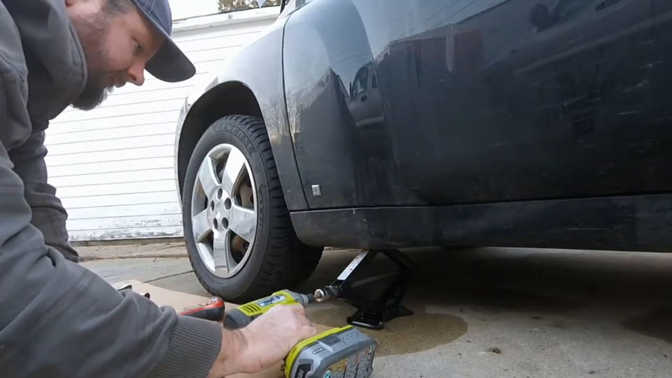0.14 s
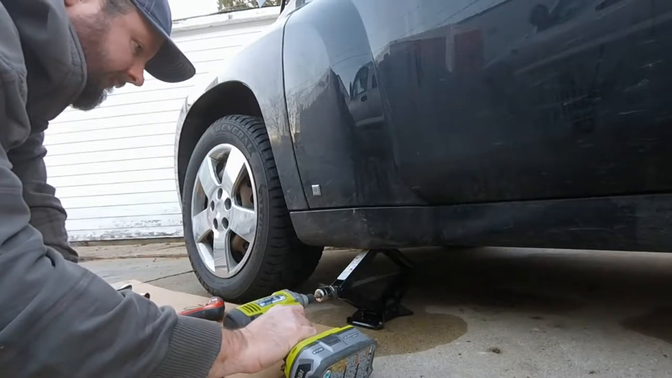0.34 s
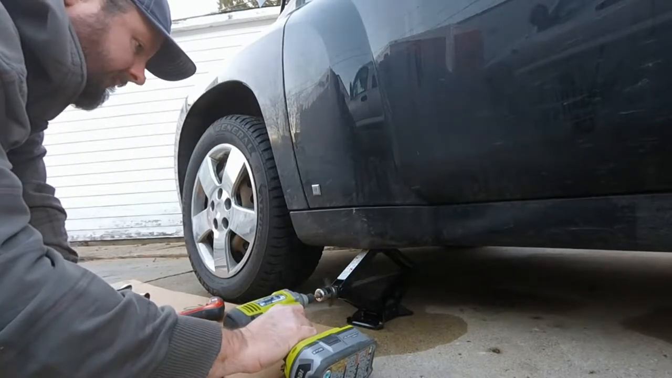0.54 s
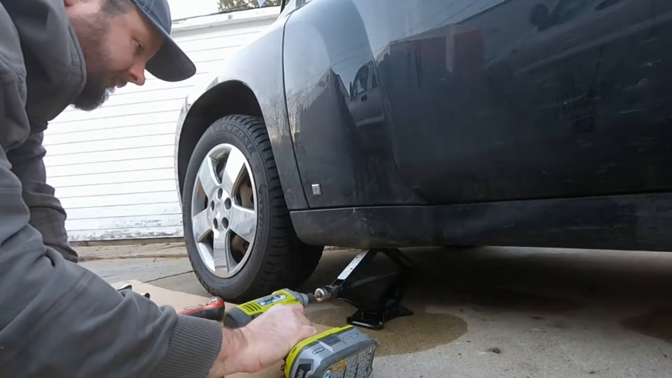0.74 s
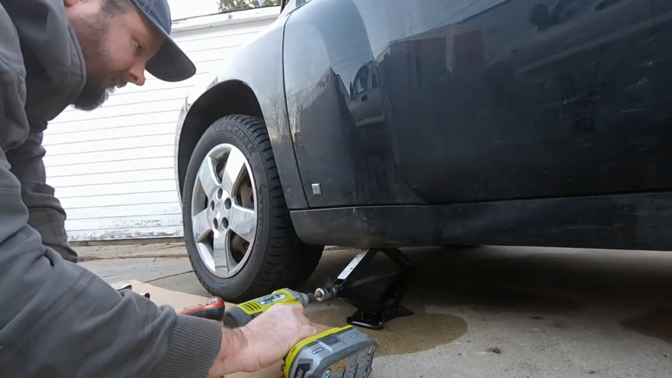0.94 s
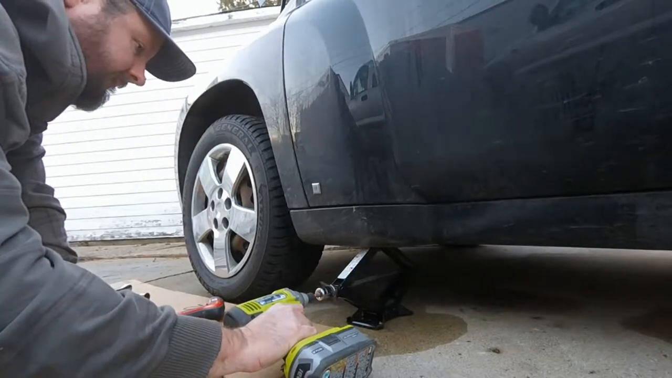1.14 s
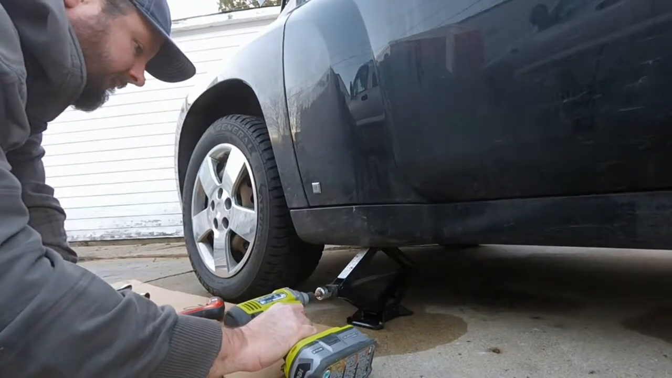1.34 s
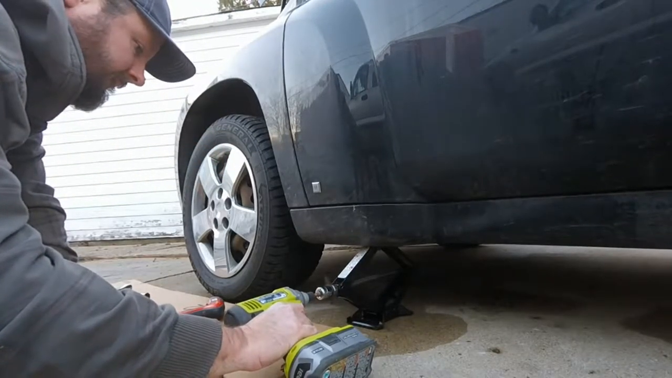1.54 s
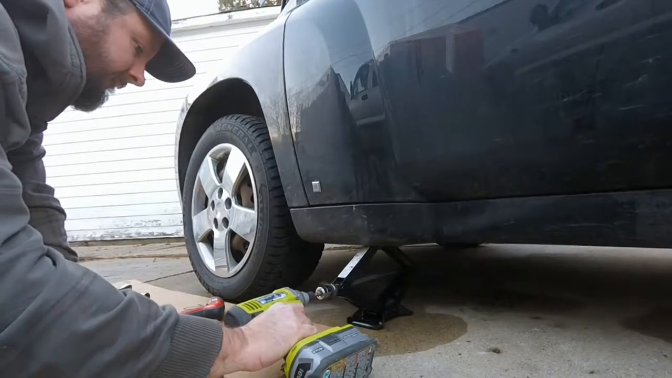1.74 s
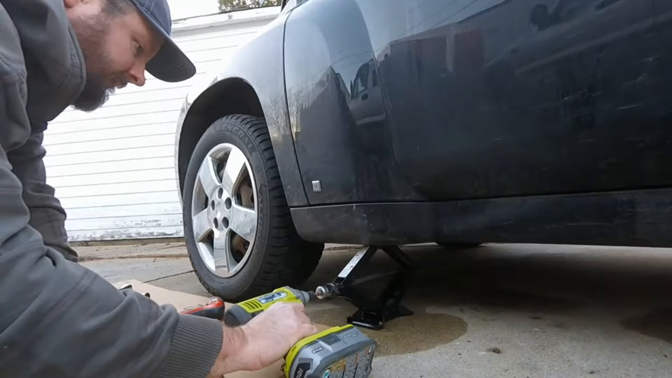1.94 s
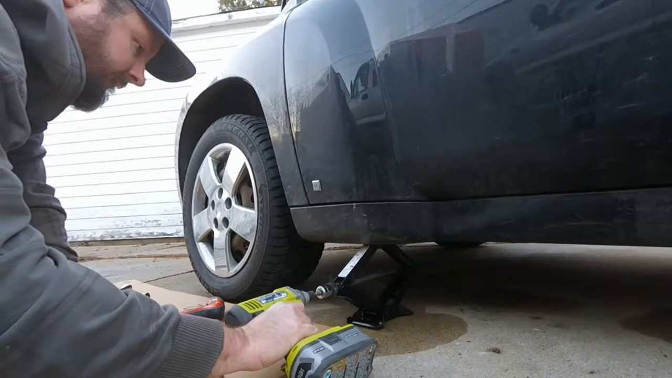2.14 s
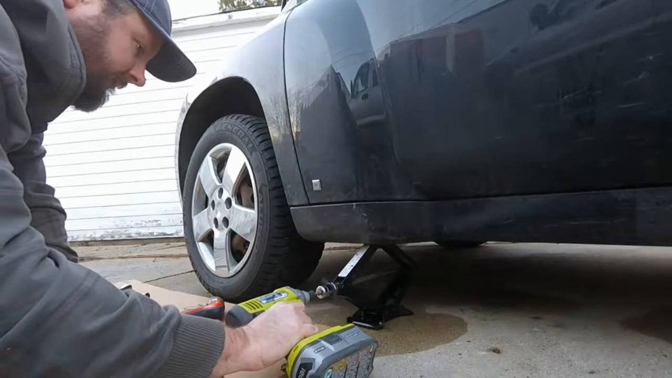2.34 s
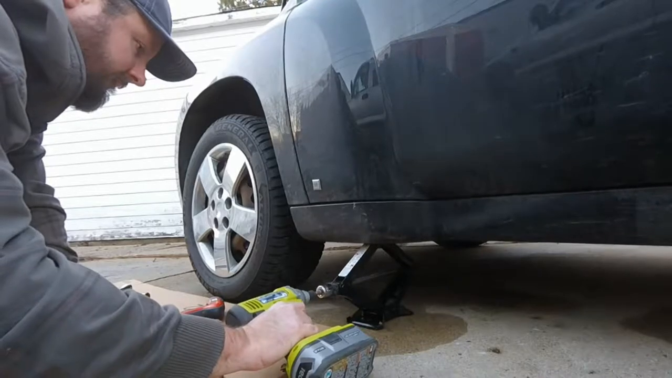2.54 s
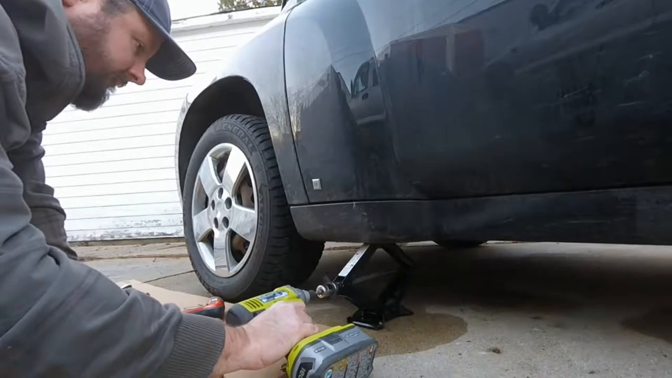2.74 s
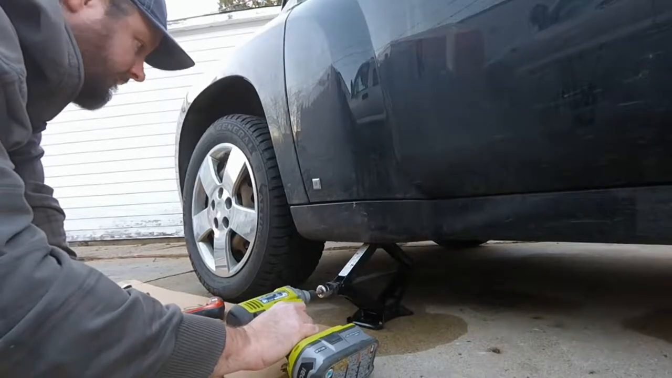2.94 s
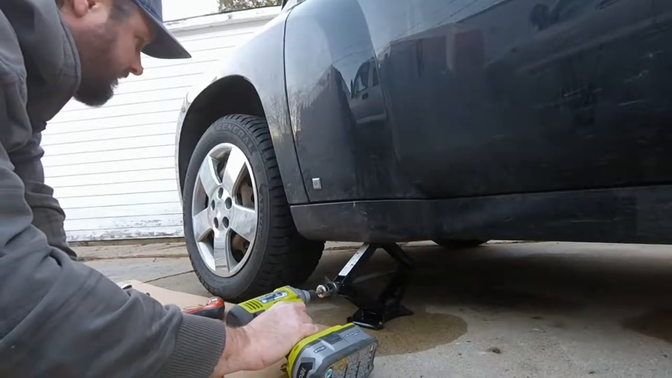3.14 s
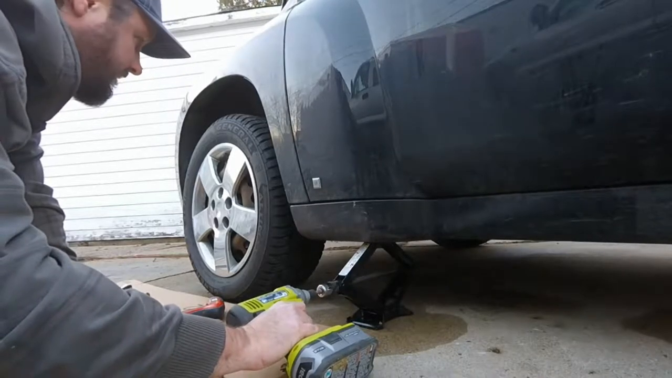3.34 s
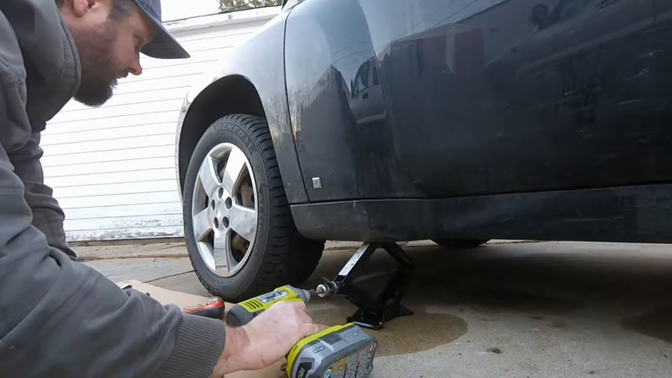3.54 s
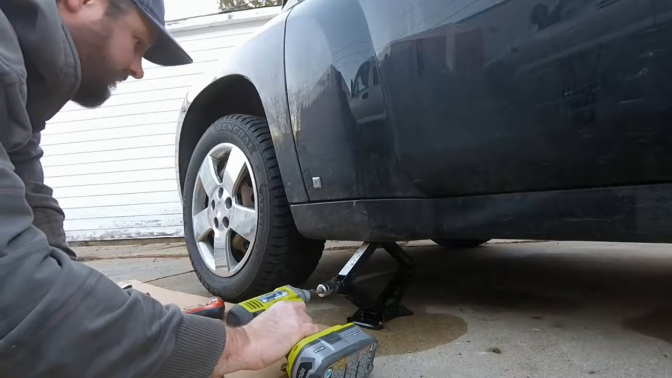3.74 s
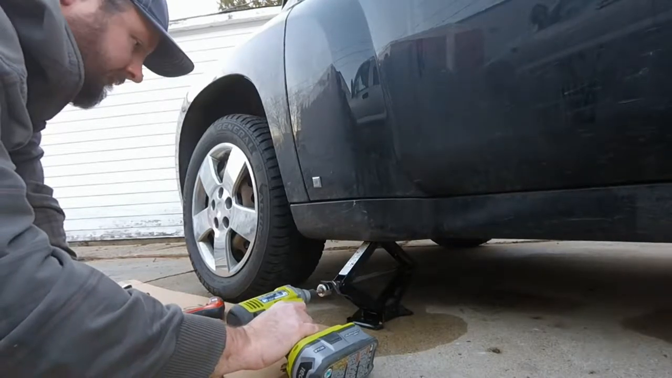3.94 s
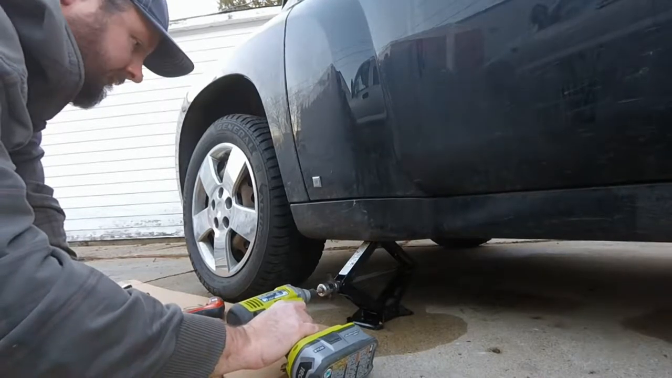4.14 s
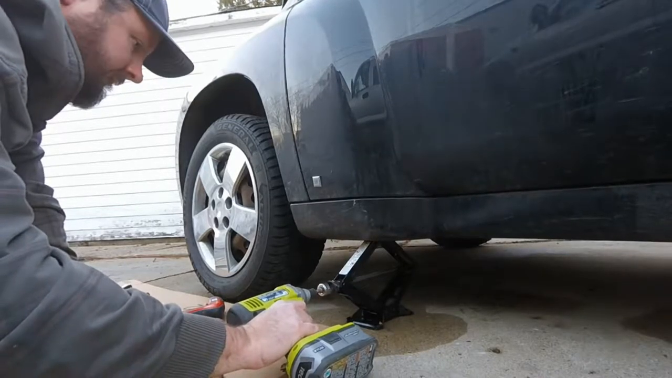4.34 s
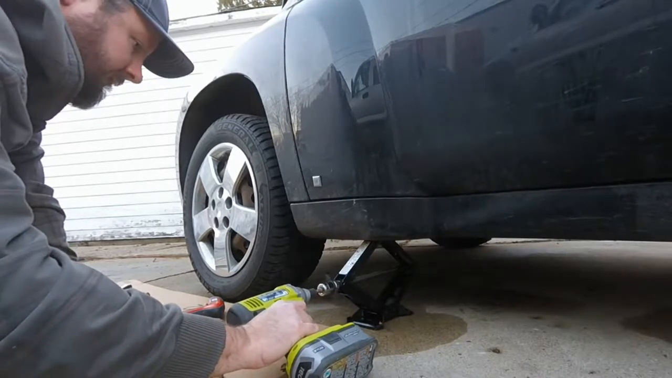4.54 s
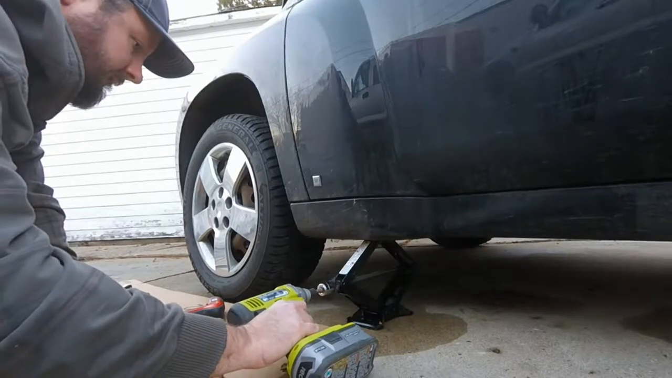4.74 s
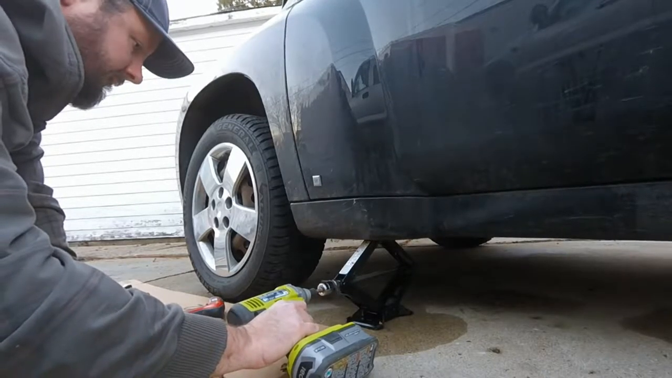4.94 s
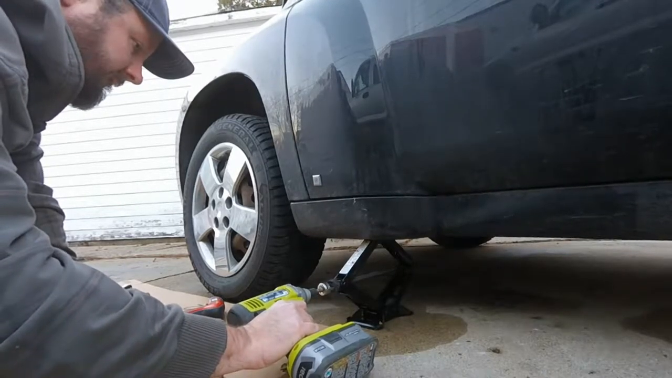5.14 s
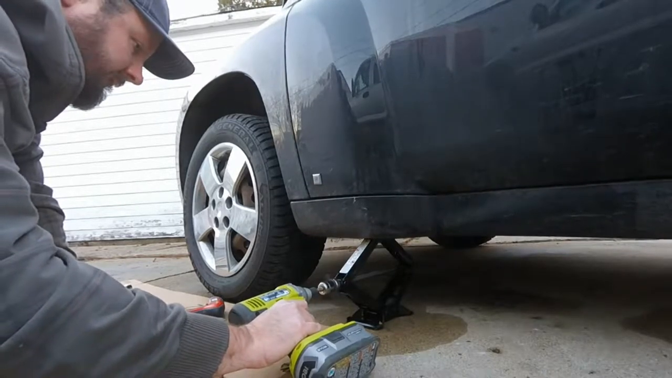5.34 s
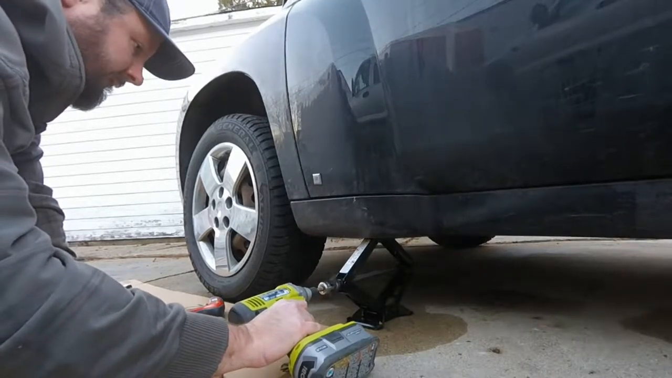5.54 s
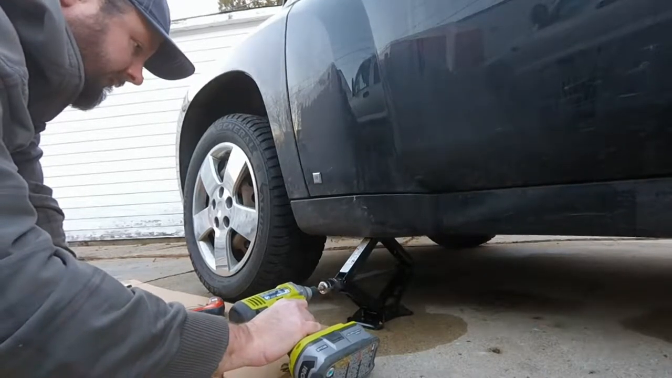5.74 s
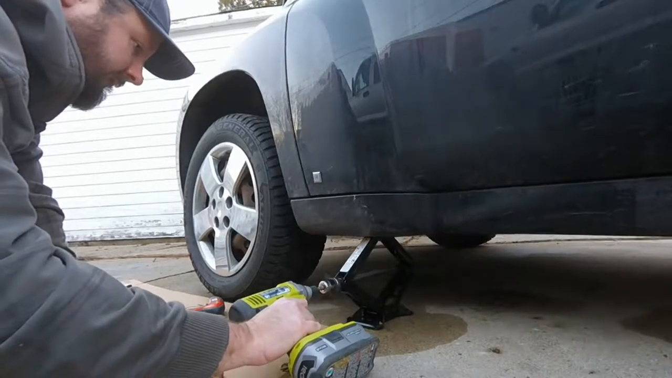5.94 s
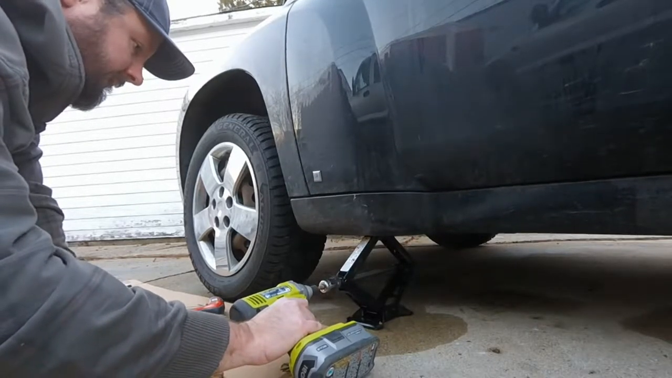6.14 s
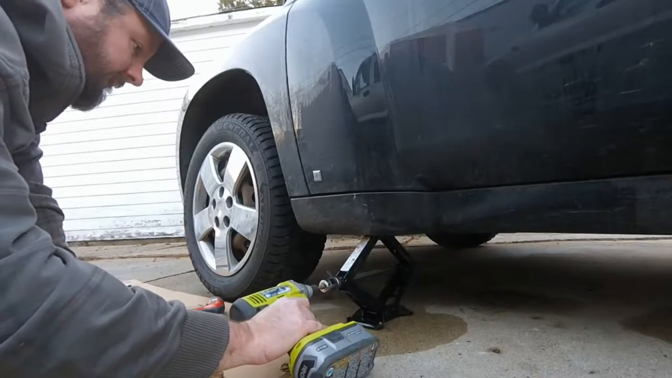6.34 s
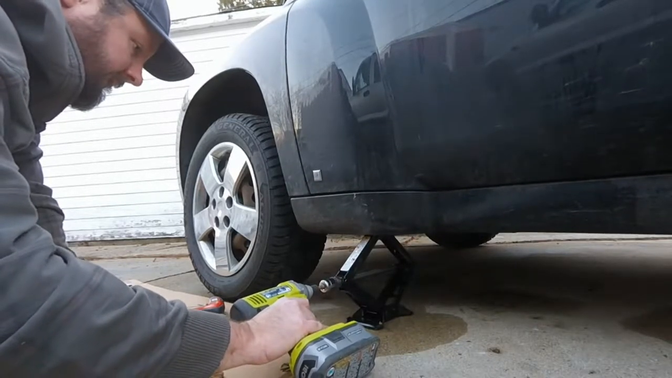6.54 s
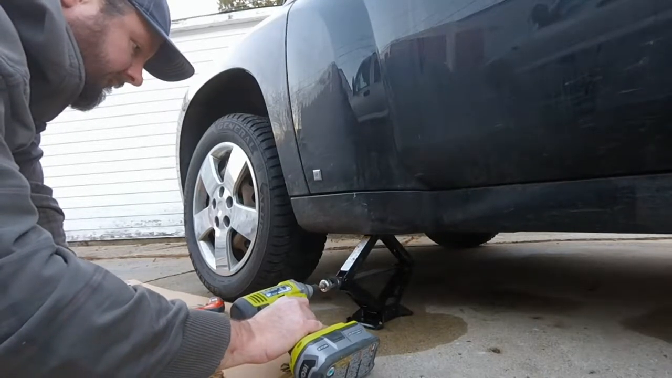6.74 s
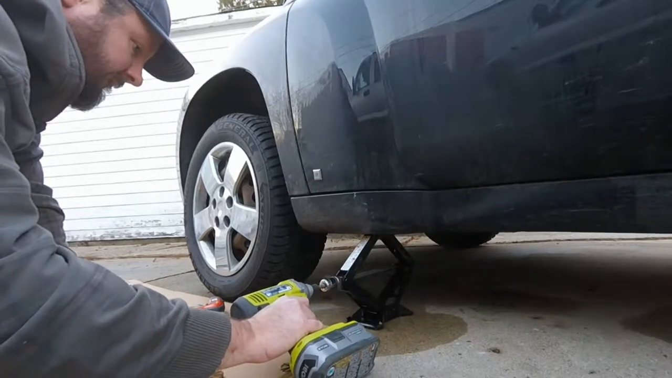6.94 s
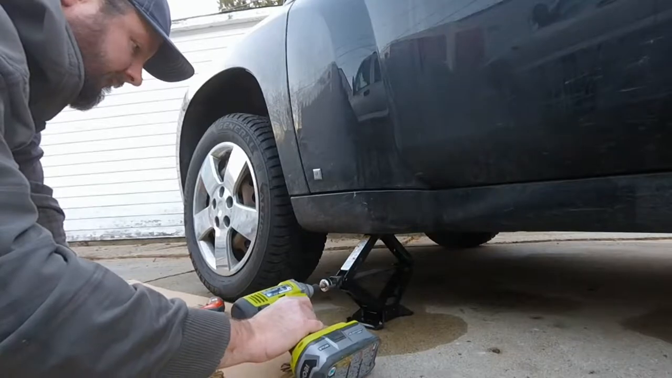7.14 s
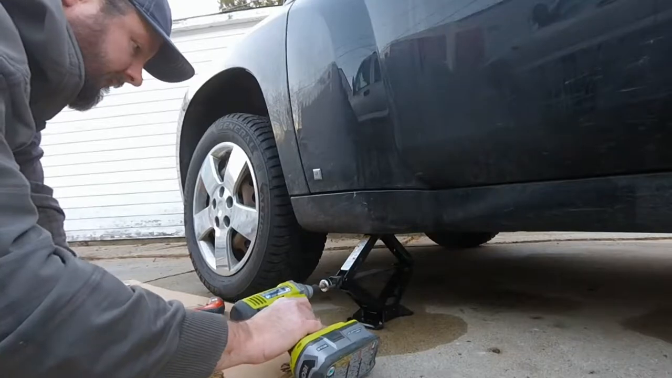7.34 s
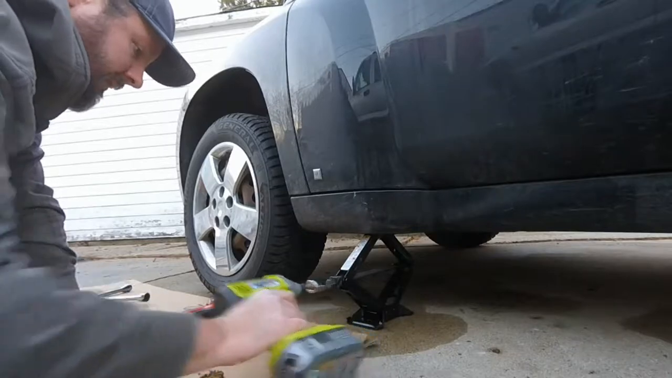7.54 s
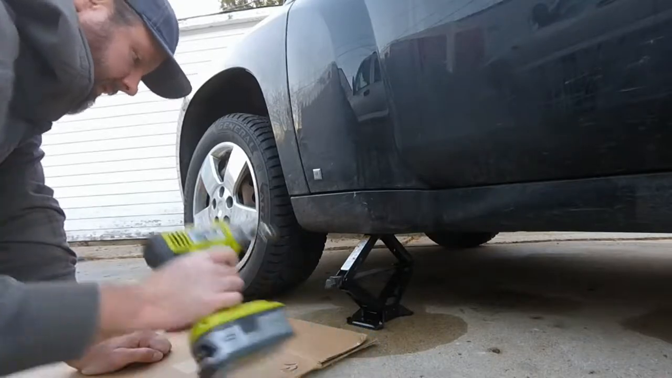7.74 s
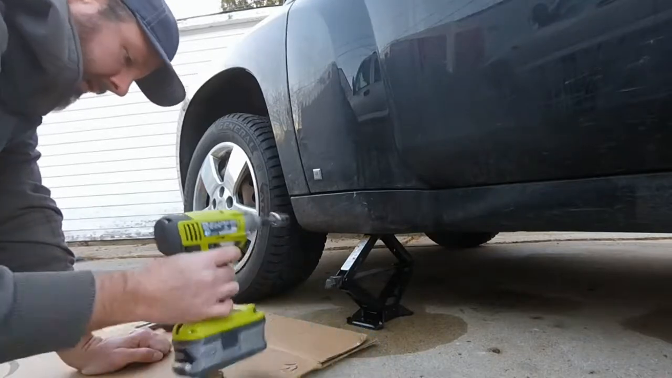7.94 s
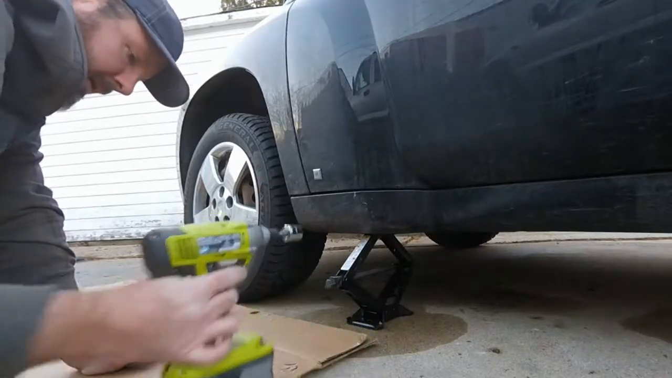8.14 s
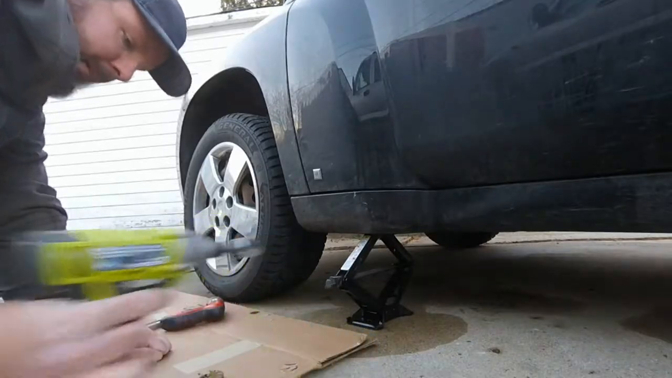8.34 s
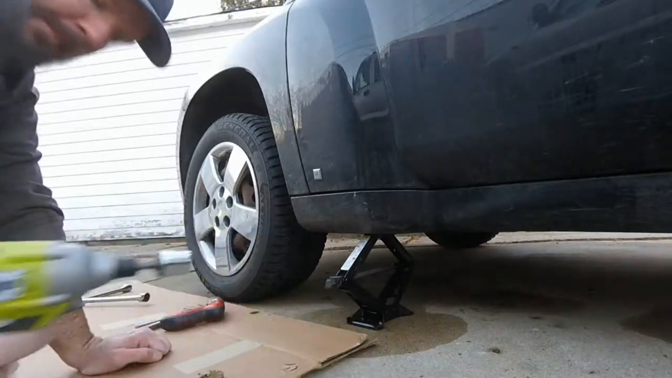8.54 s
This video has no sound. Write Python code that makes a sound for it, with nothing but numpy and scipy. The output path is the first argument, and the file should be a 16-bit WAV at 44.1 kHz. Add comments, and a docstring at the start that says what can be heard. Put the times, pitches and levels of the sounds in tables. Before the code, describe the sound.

A cordless impact driver hammers a car jack outdoors in a long metallic stutter, then short faster bursts, ending with soft wind puffs.

```python
"""Slow single blows of a cordless impact driver crack out over a faint motor whirr and a light breeze.
The driver is winding up a scissor jack under a car, outdoors on a concrete drive. Each hammer blow hits
the steel socket, rings the jack's frame and thuds into the car. The blows run into a long stutter as the
jack takes the weight, then into short, faster bursts. The tool comes off with small knocks and a sleeve
rustle, and a few puffs of wind buffet the microphone."""
import sys
import numpy as np
from scipy import signal
from scipy.fft import rfft, irfft
from scipy.io import wavfile

SR = 44100
rng = np.random.default_rng(int(sys.argv[2]) if len(sys.argv) > 2 else 0)


def generate_wav(signal):
    """Clip the signal to [-1, 1] and save it as 16-bit WAV at the path in sys.argv[1]."""
    frames = np.transpose(np.atleast_2d(signal))
    scaled = np.clip(frames, -1, 1) * 32767
    pcm = np.round(scaled).astype(np.int16)
    wavfile.write(sys.argv[1], SR, pcm)


N = 378819

# EQ curves, shape only: f/Hz, level/dB
GEAR_EQ = [(59, -32.5), (100, -24.5), (425, -9), (617, -13.5), (841, -5.5), (1440, -28), (3580, -28.5),
           (4220, -34.5), (5410, -31.5), (9070, -51), (10900, -52.5), (12600, -49), (14000, -61)]  # motor and gear whirr
WIND_EQ = [(8.8, 5.5), (15, 10.5), (32, 4), (55, -1), (130, -18), (151, -41.5), (182, -21.5), (300, -61.5),
           (390, -93), (660, -120)]  # wind rumble
AMBIENCE_EQ = [(15, -38), (25, 2), (86, -2), (152, -5), (329, -13), (373, -17), (563, -17.5), (896, -15),
               (1070, -22), (1170, -29.5), (1280, -33), (1800, -44), (2340, -45.5), (3960, -120)]  # outdoor hush
STEEL_EQ = [(880, -30), (1500, -4), (1850, -3.5), (2170, 1), (2350, -2), (2560, 3), (2950, -3), (3410, 3.5),
            (3850, -1), (4150, -9), (4480, -7), (4900, -1.5), (5340, -1), (5900, -1.5), (6680, -4.5),
            (7400, -9.5), (8970, -15), (12000, -14.5), (14500, -24), (15500, -55)]  # bright struck steel
PANEL_EQ = [(120, -41), (200, -3), (269, 4), (301, -63), (377, 14.5), (461, 5), (664, -11.5), (893, 6.5),
            (1010, 22.5), (1600, 11), (2080, -79), (3520, -120)]  # rattling car panels
SLEEVE_EQ = [(900, 9), (1500, 4), (3000, 0.5), (6000, -4.5), (8500, -11.5), (12000, -16), (15000, -22.5)]  # rustling cloth
KNOCK_EQ = [(180, -44), (300, -17.5), (649, 3.5), (1050, -3), (1490, -44), (3490, -18), (4900, -32),
            (5300, -35.5), (6680, -36), (12000, -68), (15600, -89), (22000, -120)]  # dull handling knock
# puffs of wind on the microphone: t/s, half length/s, level/dB
GUSTS = [(7.367, 0.053, -17.5), (7.592, 0.085, -16), (7.829, 0.03, -33), (7.984, 0.072, -25),
         (8.125, 0.078, -23)]
# single hammer blows: t/s, steel level/dB, body level/dB
SINGLE_BLOWS = [(0.0486, 4, 18.5), (0.175, 2.5, 17), (0.3, -2.5, 17), (0.4155, 0, 16), (0.489, -3, 14),
                (0.5458, -0.5, 14), (0.602, -1.5, 14), (0.6568, 1, 14.5), (0.7118, -1.5, 13),
                (0.765, -0.5, 14.5), (0.819, -4.5, 12.5), (0.8683, 1.5, 15), (5.556, -2, 11),
                (5.603, -5, 10), (6.451, -5, 7)]
# ring of socket and anvil: f/Hz, t60/s, level/dB
SOCKET_MODES = [(2270, 0.076, -8), (2450, 0.21, -14), (3230, .025, -12), (3410, 0.016, -12),
                (3486, 0.018, -14.5), (3750, 0.011, -6), (3866, .03, -6), (5520, 0.042, -11),
                (6210, 0.03, -15.5), (6633, 0.018, -3)]
# the hammer's bounce against its blow: t/s, level/dB
BOUNCE_LEVEL = [(.5, -6), (1.5, 0), (2.6, -5.5), (5.2, 1), (5.6, -2.5)]
# ring of the jack's frame and the sill above it:
# f/Hz, t60/s, lightly loaded level/dB, fully loaded level/dB, level under fast blows/dB
FRAME_MODES = [(274.5, 0.12, -17, -21, -18.5), (375.4, 0.29, -19, -9, -17), (388.2, 0.13, -5, -15.5, -8.5),
               (416.2, 0.14, -9, -9, -18.5), (467.3, 0.26, -17, -2, -6.5), (511.6, 0.23, -41, -11.5, -10.5),
               (538.3, 0.26, -44, -15, -12.5), (571.4, 0.24, -39, -8.5, -11.5),
               (598, 0.098, -21, -14, -8.5), (696, 0.029, -12.5, -24, -38), (815, 0.44, -13.5, -11, -18),
               (880, 0.14, -3.5, -12, -21), (915.2, 0.19, -9, -8.5, -9), (1006, 0.063, -9, -13, -10),
               (1064, 0.1, -21, -15.5, -17), (1137, 0.067, -24, -15, -16), (1192, 0.09, -19, -13, -21.5),
               (1386, 0.049, -31, -21.5, -20)]
# the screw binds and the clank turns higher and louder: t/s, half length/s, strength/0-1
BINDS = [(0.615, 0.29, 0.68), (1.997, 0.091, 0.65), (2.702, 0.28, 0.57), (3.44, 0.45, 0.86),
         (4.519, 0.11, 0.68), (5.278, 0.087, 0.48)]
# the frame's drone swells as it takes the weight: t/s, half length/s, boost/dB
DRONE_SURGE = [(2.02, 0.22, 2.5)]
# heavy sway of the car on the jack: f/Hz, t60/s, level/dB
SWAY_MODES = [(26.7, 0.35, 2.5), (57.4, 0.057, 0), (93, 0.12, -4), (123.7, 0.075, -1), (150.4, 0.12, 1.36),
              (216.2, 0.16, -0.5)]
# cam ticks between the opening blows: t/s, level/dB
CAM_TICKS = [(.122, -30), (.16, -15), (.247, -31), (.286, -14), (0.372, -17), (.404, -18), (.478, -14),
             (.535, -8)]
# tempo of the long stutter: t/s, blow rate/Hz
STUTTER_RATE = [(0.9086, 27.17), (0.94, 30.16), (1.59, 28.4), (1.68, 33.14), (2.1, 32.51), (2.46, 30.69),
                (3.71, 30.03), (3.76, 30.3), (4.57, 29.61), (5.23, 30.48)]
# how hard the steel rings in the stutter: t/s, level/dB
STUTTER_STEEL = [(.9, 3), (1.2, -0.5), (1.65, -3), (2.1, -0.5), (2.5, 3), (3.3, 5.5), (4.1, 3.5),
                 (4.7, 1.5), (5.2, 4)]
# the hammer's two lugs land unequally, strong then weak: t/s, swing either way/dB
LUG_SWING = [(1.55, 1.3), (1.75, 2.5), (2.2, 0.8), (2.5, -0.3)]
# accents on blows of the stutter: t/s, steel gain/dB, clank gain/dB
ACCENTS = [(1.177, 3, -1), (1.279, 0.5, 3.5), (1.415, 0.5, 2), (1.626, -1.5, 3.5), (1.749, 1, 1.5),
           (1.931, 2.5, 1.5), (1.961, 3, 1), (1.991, 2.5, 1), (2.053, 1.5, -2), (2.593, 0.5, 3.5),
           (2.922, 1.5, -3), (2.955, 1, 1), (3.02, 2.5, 1.5), (3.186, 1.5, -0.5), (3.815, -1.5, -1),
           (4.047, 3, -4), (4.28, 1.5, 2.5), (4.685, -1, -2.5), (4.752, 0.5, -5.5), (5.053, 2, -2)]
# fader of the sleeve rustle: t/s, level/dB
SLEEVE_LEVEL = [(7.5, -67), (7.9, -62.5), (8.5, -59.5)]
# knocks as the tool comes away: t/s, knock level/dB, knock t60/s, metal tick level/dB
KNOCKS = [(7.573, -64, 0.11, -65), (7.605, -47, 0.083, -58), (8.251, -33, 0.045, -62)]
# short trigger pulls: start/s, end/s, coasting time/s, body level/dB, steel level/dB
TRIGGER_PULLS = [(5.215, 5.552, 0.096, 13.5, 2), (5.67, 5.934, 0.027, 13.5, 1.5),
                 (5.939, 6.426, 0.069, 14, 2), (6.613, 6.775, 0.098, 15.5, 3),
                 (6.805, 7.009, 0.053, 13.5, 2), (7.082, 7.234, 0.04, 14, 2.5)]

STUTTER_START_S, STUTTER_END_S = STUTTER_RATE[0][0], STUTTER_RATE[-1][0]
SLOW_HZ, FAST_HZ = 29, 54.2  # blow rates at the start of a burst and at full speed
BOUNCE_S, SPRING_S = .0249, .015  # after a blow: the hammer bounces, the frame springs back
SPLIT_HZ = 650  # frame modes below this drone, those above it clank
HIT_T = np.arange(SR // 4) / SR  # time axis of one hit


def undb(db):
    """Decibels to gain."""
    return 10 ** (np.asarray(db) / 20)


def curve(table, at):
    """Value of an automation curve at the given times."""
    return np.interp(at, *np.transpose(table))


def swells(at, table, height=np.asarray):
    """Sum of bell-shaped swells; height maps the table's last column to their peaks."""
    s, half, peak = np.transpose(table)
    return np.exp(-((at[:, None] - s) / half) ** 2) @ height(peak)


def colour(x, eq, size=8192):
    """Minimum-phase EQ with unit energy."""
    hz, db = np.transpose(eq)
    gain = undb(np.interp(np.log(np.fft.rfftfreq(size, 1 / SR) + 1), np.log(hz), db))
    cepstrum = irfft(np.log(gain))[:size // 2]
    cepstrum[0] /= 2
    response = irfft(np.exp(rfft(2 * cepstrum, size)))
    return signal.fftconvolve(x, response / np.linalg.norm(response))[:len(x)]


def noise(eq):
    """Coloured noise bed of rms about 1."""
    return colour(rng.standard_normal(N), eq)


def fade(t60, rise):
    """Attack and decay envelope with unit energy; times in seconds."""
    shape = (1 - np.exp(-HIT_T / rise)) * np.exp(-np.log(1000) * HIT_T / t60)
    return shape / np.linalg.norm(shape)


def place(times, sounds):
    """Lay one sound at each time."""
    out = np.zeros(N + SR)
    for start, sound in zip((np.maximum(times, 0) * SR).astype(int), sounds):
        out[start:start + len(sound)] += sound
    return out[:N]


def rings(modes, rise):
    """One decaying sine per mode."""
    return np.array([undb(db) * fade(t60, rise) * np.sin(2 * np.pi * hz * HIT_T)
                     for hz, t60, db in modes])


def repitch(hits, ratios):
    """Varispeed each hit by its own ratio."""
    return np.array([np.interp(HIT_T * ratio, HIT_T, hit) for ratio, hit in zip(ratios, hits)])


def noise_hits(s, sizes, envelope, alike=0):
    """Dense ringing at times s: the share `alike` repeats at every hit, the rest is new."""
    same, new = rng.standard_normal(len(envelope)), rng.standard_normal((len(s), len(envelope)))
    return place(s, sizes[:, None] * envelope * (np.sqrt(alike) * same + np.sqrt(1 - alike) * new))


def opening(s):
    """True during the slow blows ahead of the stutter."""
    return s < STUTTER_START_S


def motor(t, lead_s=.042, run_down_db_per_s=267, slow_db=-29, steady_db=-23):
    """Motor and gears whirr up as the trigger is pulled and run down after it."""
    envelope = np.zeros(N)
    for start, end, *_ in [(-lead_s, STUTTER_END_S), *TRIGGER_PULLS]:
        attack = np.clip(1 + (t - start) / lead_s, 0, 1) ** 2
        release = undb(-run_down_db_per_s * np.maximum(t - end, 0))
        envelope = np.maximum(envelope, attack * release)
    return noise(GEAR_EQ) * envelope * undb(np.where(opening(t), slow_db, steady_db))


def wind(t, breeze_db=-38.5):
    """A light breeze rumbles on the microphone, with a few puffs at the end."""
    return noise(WIND_EQ) * (undb(breeze_db) + swells(t, GUSTS, undb))


def hammer(jitter_s=.00008, body_scatter_db=.15, steel_scatter_db=.97):
    """Cue list of all blows: times, body gains, steel gains, 1 where the hammer bounces back."""
    s, steel_db, body_db = np.transpose(SINGLE_BLOWS)
    singles = np.c_[s, body_db, steel_db, opening(s)]
    runs = np.vstack([stutter()] + [burst(*pull) for pull in TRIGGER_PULLS])
    runs += rng.standard_normal(runs.shape) * [jitter_s, body_scatter_db, steel_scatter_db, 0]
    s, body_db, steel_db, bounces = np.vstack([singles, runs]).T
    return s, undb(body_db), undb(steel_db), bounces


def socket(s, size, bounces, opening_boost_db=4, clink_scatter_db=4.5, detuning=.025):
    """Steel on steel: a crack, a bright ring and a clink, then a drier clack as the hammer bounces."""
    hits = np.r_[s, s + BOUNCE_S + .0005 * rng.standard_normal(len(s))]
    bounce = size * bounces * undb(curve(BOUNCE_LEVEL, s))
    crack_size = np.r_[size * undb(opening_boost_db * opening(s)), bounce]
    crack_size *= undb(-4 + 1.5 * rng.standard_normal(len(hits)))
    crack = noise_hits(hits, crack_size, fade(t60=.022, rise=.0007), alike=.3)
    ring_size = undb(.54) * np.r_[size, bounce * undb(-7)]
    ring = noise_hits(hits, ring_size, fade(t60=.1, rise=.003), alike=.3)
    # the loose socket sits differently at every blow, shifting the clink's tone and pitch
    scatter_db = clink_scatter_db * rng.standard_normal((len(hits), len(SOCKET_MODES)))
    clink_db = -9 + opening_boost_db * opening(hits)[:, None] + scatter_db
    clinks = (np.r_[size, bounce][:, None] * undb(clink_db)) @ rings(SOCKET_MODES, rise=.001)
    clinks = repitch(clinks, 1 + detuning * rng.standard_normal(len(hits)))
    return colour(crack + ring, STEEL_EQ) + place(hits, clinks)


def load(s, from_s=1.504, takes_s=1.49):
    """The car's weight comes onto the jack, 0 to 1."""
    return np.clip((s - from_s) / takes_s, 0, 1)


def accent(s, reach_s=.012):
    """Extra steel dB and clank dB of each blow."""
    table = np.array(ACCENTS)
    return ((np.abs(s[:, None] - table[:, 0]) < reach_s) @ table[:, 1:]).T


def frame_levels(s, bind_hz=1017, free_hz=836, width_hz=74):
    """Level in dB of each frame mode at each blow: it shifts with load, hammer speed and binding."""
    hz, _, light_db, loaded_db, fast_db = np.transpose(FRAME_MODES)
    slow_db = light_db + (loaded_db - light_db) * load(s)[:, None]
    base_db = np.where(s[:, None] > STUTTER_END_S, fast_db, slow_db)
    # as the screw binds, its free ring gives way to a higher, louder one
    bound, free = (np.exp(-((hz - centre) / width_hz) ** 2) for centre in (bind_hz, free_hz))
    bind_db = swells(s, BINDS)[:, None] * (12 * bound - 4.5 * free)
    clank_db = 2 * opening(s) + accent(s)[1]
    drone_db = swells(s, DRONE_SURGE)
    return base_db + bind_db + np.where(hz > SPLIT_HZ, clank_db[:, None], drone_db[:, None])


def frame_ring(s, size, bounces, band, *, lag_s, rise_s, knock_s, centre_hz, sweep_s_per_hz,
               scatter_rad, scatter_db, spring_db, jitter_s, detuning=.005):
    """A band of frame modes swells into one knock, beats apart and is struck again on springing back."""
    hz = np.transpose(FRAME_MODES)[0]
    modes = np.array([fade(t60, rise_s) * np.exp(2j * np.pi * f * (HIT_T - knock_s))
                      for f, t60, *_ in FRAME_MODES])
    slow = opening(s)
    play = np.where(bounces > 0, 1, .55)[:, None]  # the joints are loosest when the hammer bounces
    # opening blows and squarely landed ones knock more cleanly
    smear = play * np.where(slow | (accent(s)[1] > 1), .3, 1)[:, None]
    gains = size[:, None] * undb(frame_levels(s))
    seating, lateness = rng.standard_normal((len(s), 2)).T
    # under load the modes arrive one after another
    sweep = np.pi * sweep_s_per_hz * load(s)[:, None] * (hz - centre_hz) ** 2
    phase = scatter_rad * smear * rng.standard_normal(gains.shape) - sweep
    struck = gains * undb(scatter_db * play * rng.standard_normal(gains.shape)) * np.exp(1j * phase)
    knocks = repitch((struck[:, band] @ modes[band]).imag, 1 + detuning * play[:, 0] * seating)
    onset = s + lag_s
    spring_size = bounces * undb(spring_db - .5 * slow)
    spring_back = place(onset + SPRING_S + jitter_s * lateness, spring_size[:, None] * knocks)
    hammer_bounce = undb(-17.5) * place(onset[slow] + BOUNCE_S, knocks[slow])
    return place(onset, knocks) + spring_back + hammer_bounce


def jack(s, size, bounces):
    """The twist runs down the screw into the frame: a clank over a drone that springs back ever harder."""
    low = np.transpose(FRAME_MODES)[0] < SPLIT_HZ
    drone = frame_ring(s, size, bounces, low, lag_s=.004 + .003 * (1 - load(s)),
                       rise_s=.0025, knock_s=.0035, centre_hz=470, sweep_s_per_hz=-.00002,
                       scatter_rad=.25, scatter_db=1.3, spring_db=-5.5 + .53 * s, jitter_s=.00015)
    clank = frame_ring(s, size, bounces, ~low, lag_s=.0035,
                       rise_s=.004, knock_s=.0065, centre_hz=1000, sweep_s_per_hz=.000022,
                       scatter_rad=.42, scatter_db=1.8, spring_db=-8, jitter_s=.0003)
    return drone + clank


def car(s, size, rattle_db=-18):
    """The low end: each blow rocks the car on its springs and rattles its panels a little."""
    rattle = colour(noise_hits(s + .005, size, fade(t60=.07, rise=.002), alike=.3), PANEL_EQ)
    sway_size = size * undb(np.where(opening(s), -14, -13))
    sway = place(s + .0045, sway_size[:, None] * rings(SWAY_MODES, rise=.0025).sum(0))
    return undb(rattle_db) * rattle + sway


def chatter(s, size, earliest_s=.0072, latest_s=.019):
    """The loose socket ticks once more after each blow, loudest where the hammer bounces hard."""
    times = s + rng.uniform(earliest_s, latest_s, len(s))
    sizes = size * undb(-11 + .5 * curve(BOUNCE_LEVEL, s) + rng.standard_normal(len(s)))
    return colour(noise_hits(times, sizes, fade(t60=.084, rise=.0004)), STEEL_EQ)


def reflections(x, wet_db=-14):
    """Add a tight slap from the ground, the underbody and the garage door."""
    tail = fade(t60=.033, rise=.0074) * rng.standard_normal(len(HIT_T))
    return x + undb(wet_db) * signal.fftconvolve(x, tail)[:N]


def cam():
    """Faint steel ticks while the hammer winds up for a slow blow."""
    s, db = np.transpose(CAM_TICKS)
    return colour(noise_hits(s, undb(db), fade(t60=.044, rise=.00056)), STEEL_EQ)


def strikes(rate_hz):
    """Sample numbers at which the hammer strikes, given its blow rate at every sample."""
    count = np.cumsum(rate_hz) / SR
    return np.searchsorted(count, np.arange(np.ceil(count[-1])))


def stutter(body_db=13, strong_lug_s=1.749, bind_duck_db=-3.5):
    """Cues for the long run: even blows, each with time to bounce; the steel ducks as the screw binds."""
    t = np.arange(STUTTER_START_S, STUTTER_END_S - .5 / SLOW_HZ, 1 / SR)
    s = t[strikes(curve(STUTTER_RATE, t))]
    lug = np.cos(np.pi * (np.arange(len(s)) - np.argmin(np.abs(s - strong_lug_s))))  # +1, -1 in turn
    steel_db = curve(STUTTER_STEEL, s) + bind_duck_db * swells(s, BINDS)
    steel_db += lug * curve(LUG_SWING, s) + accent(s)[0]
    return np.c_[s, np.full(len(s), body_db), steel_db, np.ones(len(s))]


def burst(start, end, coast_s, body_db, steel_db, spin_up_s=.06):
    """Cues for one trigger pull: the hammer spins up, buzzes and coasts down."""
    t = np.arange(start, end, 1 / SR)
    coasting = np.clip(1 - (end - t) / coast_s, 0, 1)
    speed = np.minimum((t - start) / spin_up_s, 1 - coasting)
    hit = strikes(SLOW_HZ + (FAST_HZ - SLOW_HZ) * speed)
    # a slow or coasting hammer hits softer
    body = body_db - 4 * (1 - speed) - 7.5 * coasting
    steel = steel_db - 2 * (1 - speed) - 7.5 * coasting
    bounces = speed < .5
    return np.c_[t, body, steel, bounces][hit]


def sleeve(t):
    """A faint cloth hiss rises to a rustle as the arm draws back."""
    return noise(SLEEVE_EQ) * undb(curve(SLEEVE_LEVEL, t))


def handling():
    """Socket and tool knock as they come away, each time with a tick of metal."""
    s, knock_db, t60s, tick_db = np.transpose(KNOCKS)
    taps = np.array([np.sqrt(SR / 100) * fade(t60, rise=.001) * rng.standard_normal(len(HIT_T))
                     for t60 in t60s])
    knocks = colour(place(s, undb(knock_db)[:, None] * taps), KNOCK_EQ)
    ticks = colour(place(s, undb(tick_db)[:, None] * taps), STEEL_EQ)
    return knocks + ticks


def scene(ambience_db=-43.5):
    """Mono mix: driver, jack and car up front, over the wind and the outdoor hush."""
    t = np.arange(N) / SR
    s, body, steel, bounces = hammer()
    bright = socket(s, steel, bounces) + chatter(s, steel) + cam()
    weight = jack(s, body, bounces) + car(s, body)
    tool = reflections(bright + weight + motor(t))
    foley = sleeve(t) + handling()
    bed = wind(t) + noise(AMBIENCE_EQ) * undb(ambience_db)
    return (tool + foley + bed)[None]


def record(dry, low_cut_hz=18, ceiling=.78, high_cut_hz=15500):
    """Master chain: drop the deepest bass, round the loudest peaks and cut the top."""
    x = signal.sosfilt(signal.butter(2, low_cut_hz, "high", fs=SR, output="sos"), dry)
    x = x / (1 + (x / ceiling) ** 8) ** (1 / 8)
    return signal.sosfilt(signal.ellip(8, .2, 70, high_cut_hz, fs=SR, output="sos"), x)


dry = scene()
out = record(dry)
generate_wav(out)
```